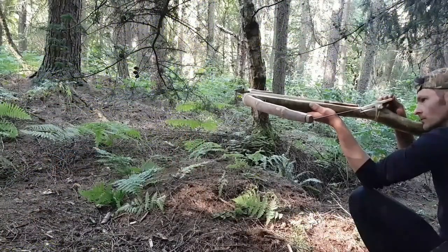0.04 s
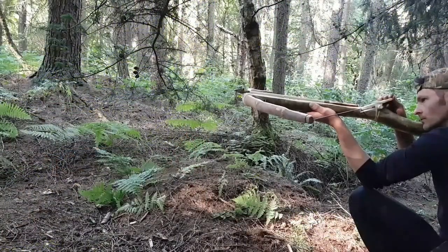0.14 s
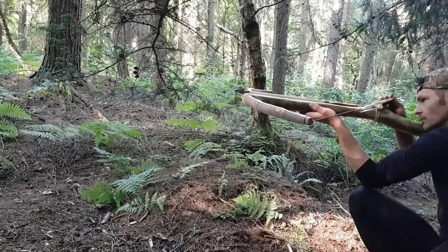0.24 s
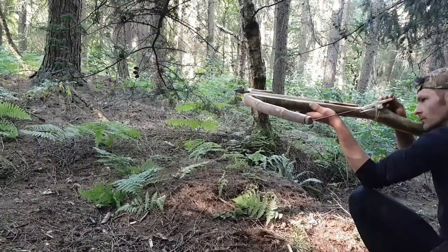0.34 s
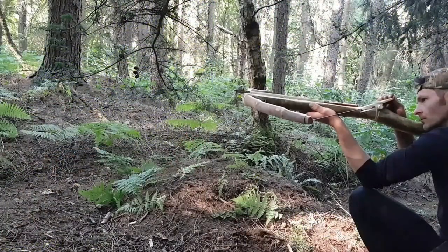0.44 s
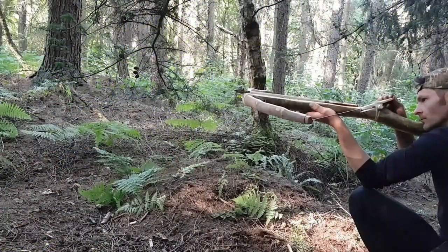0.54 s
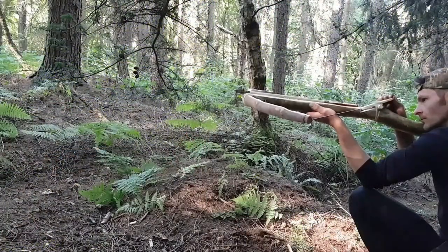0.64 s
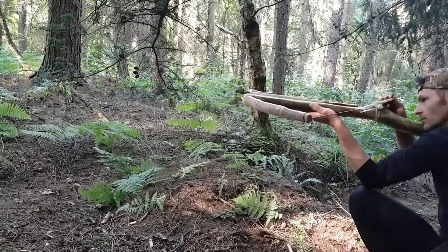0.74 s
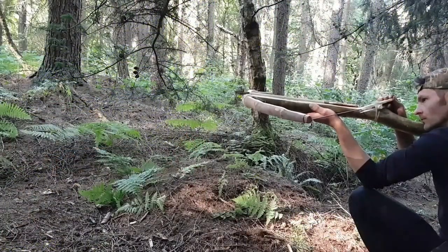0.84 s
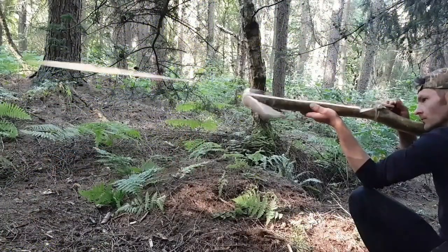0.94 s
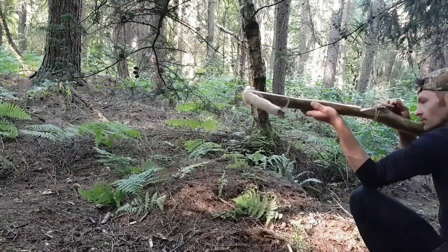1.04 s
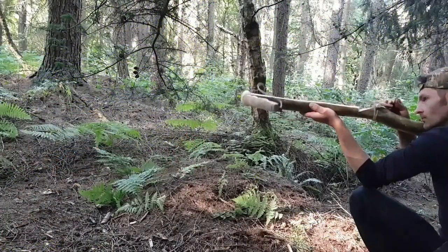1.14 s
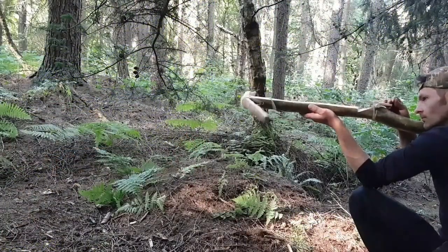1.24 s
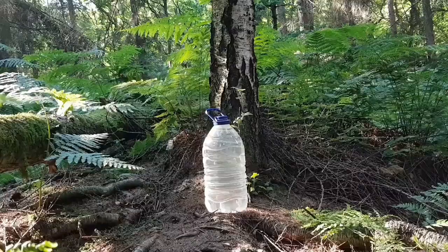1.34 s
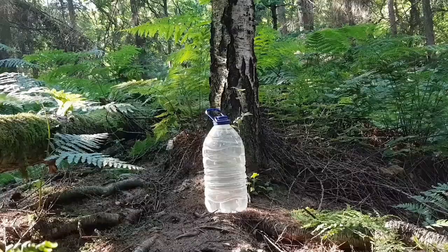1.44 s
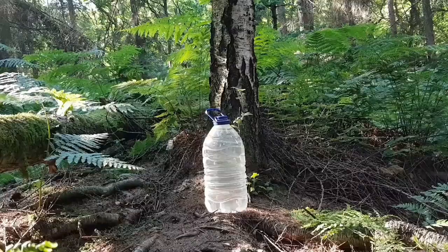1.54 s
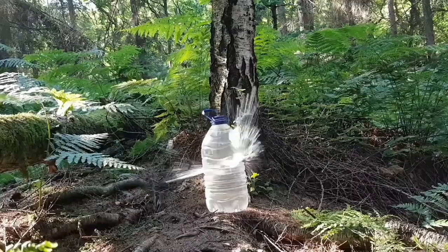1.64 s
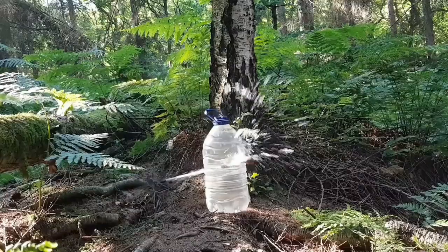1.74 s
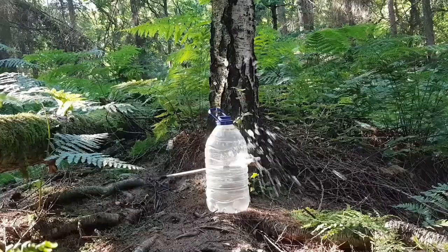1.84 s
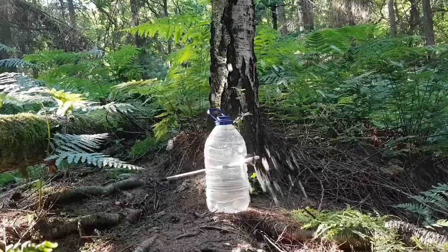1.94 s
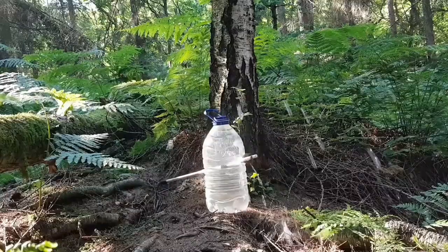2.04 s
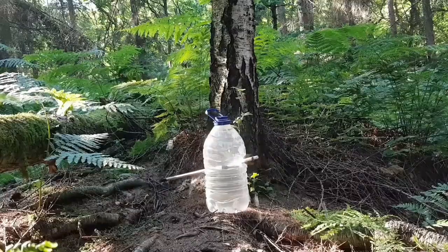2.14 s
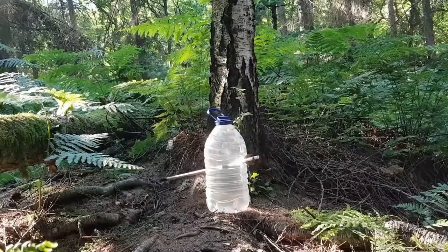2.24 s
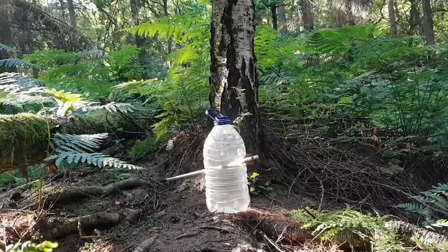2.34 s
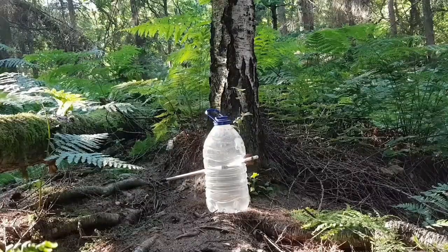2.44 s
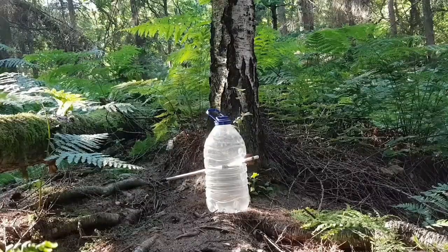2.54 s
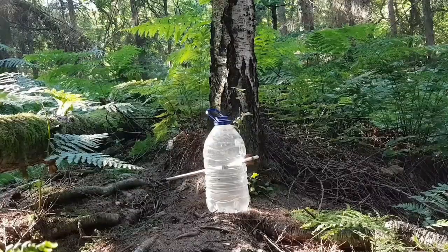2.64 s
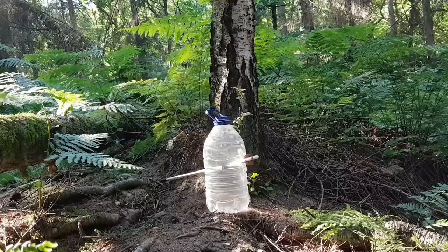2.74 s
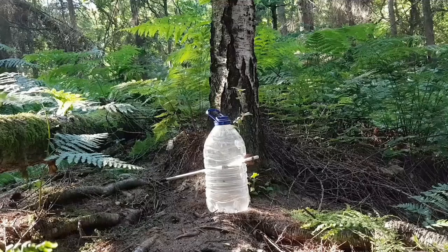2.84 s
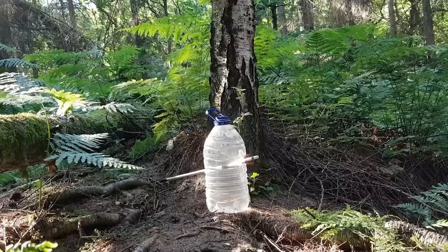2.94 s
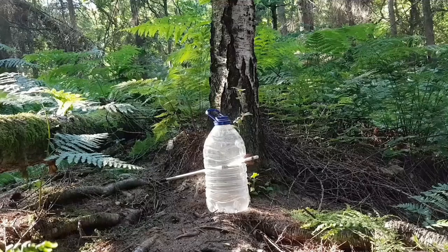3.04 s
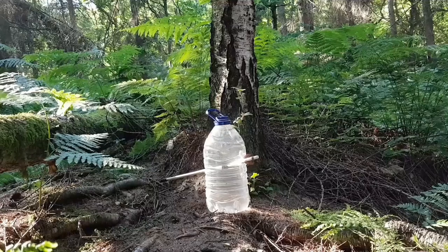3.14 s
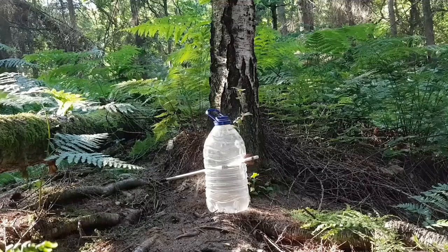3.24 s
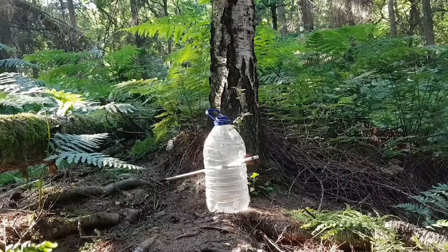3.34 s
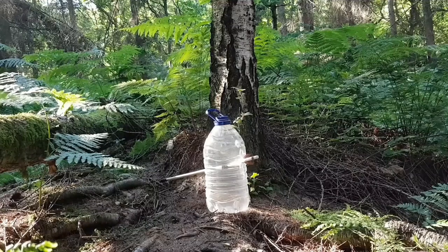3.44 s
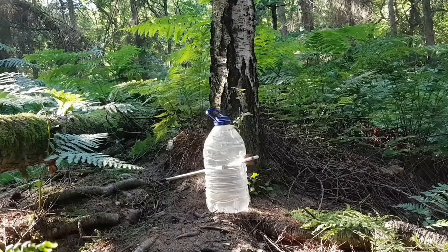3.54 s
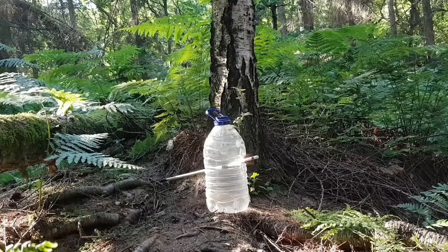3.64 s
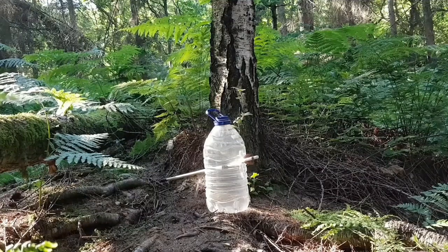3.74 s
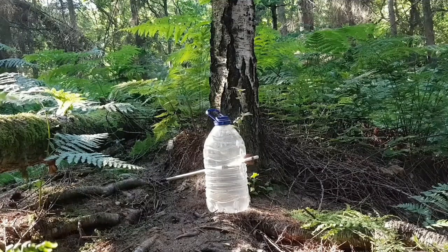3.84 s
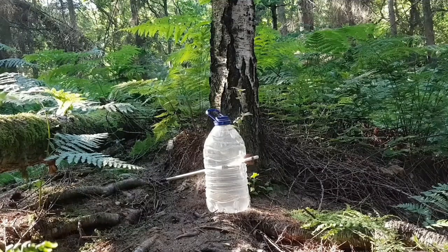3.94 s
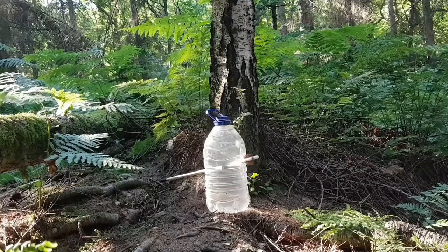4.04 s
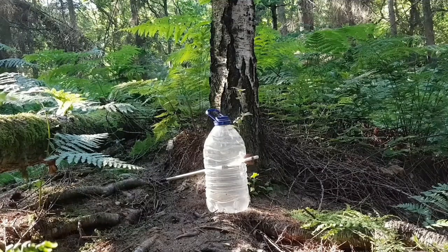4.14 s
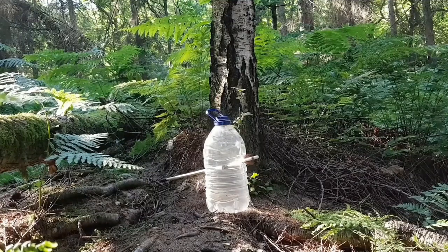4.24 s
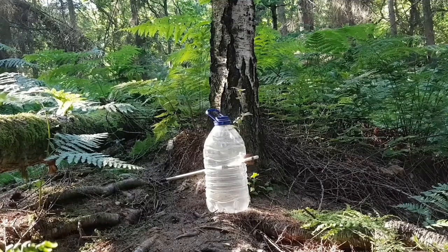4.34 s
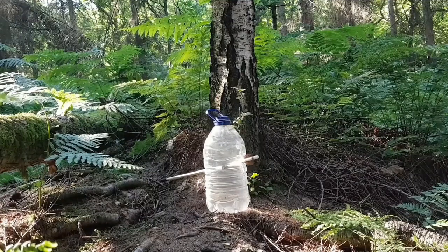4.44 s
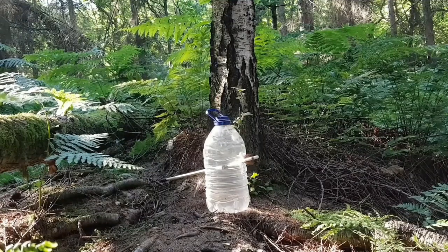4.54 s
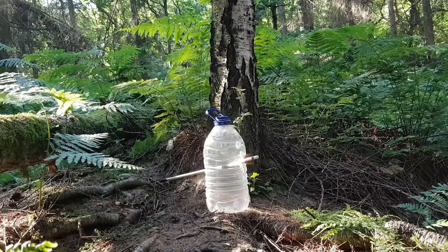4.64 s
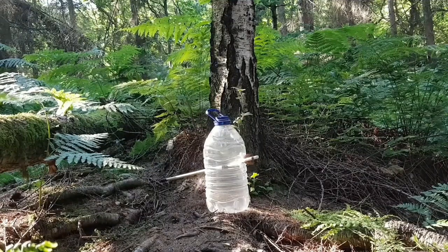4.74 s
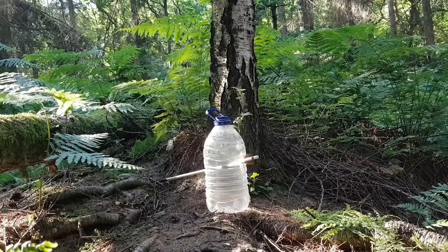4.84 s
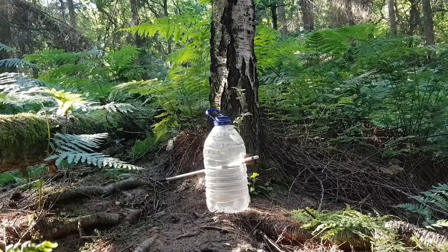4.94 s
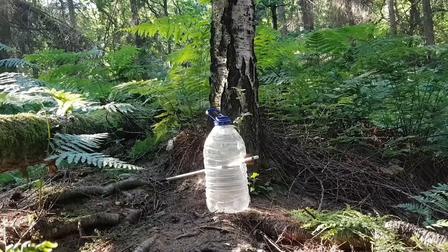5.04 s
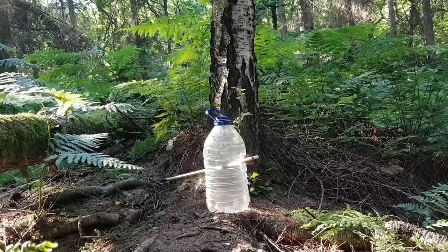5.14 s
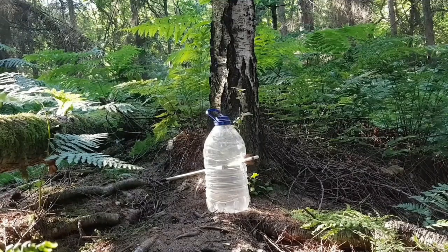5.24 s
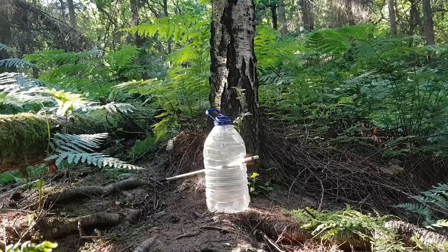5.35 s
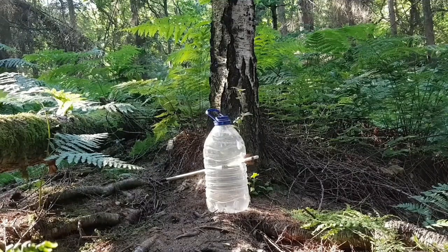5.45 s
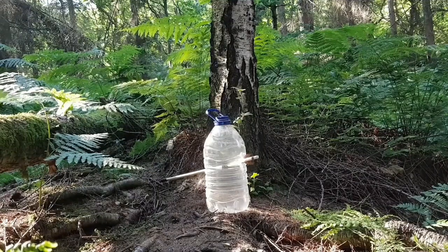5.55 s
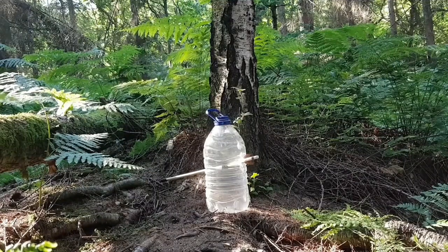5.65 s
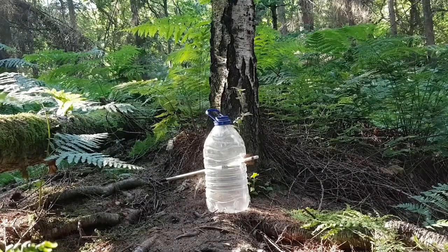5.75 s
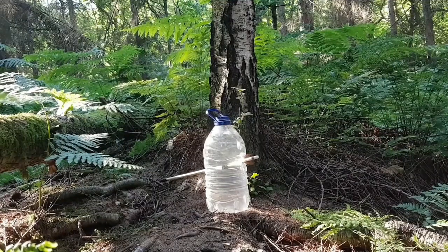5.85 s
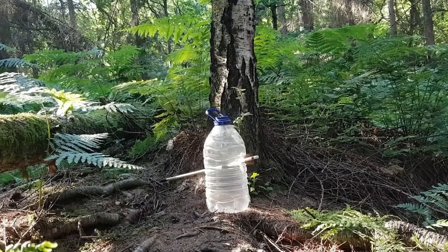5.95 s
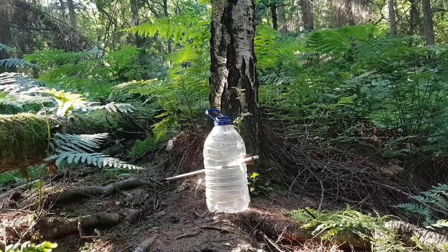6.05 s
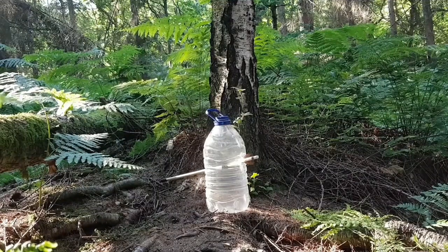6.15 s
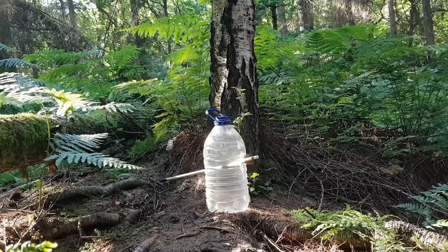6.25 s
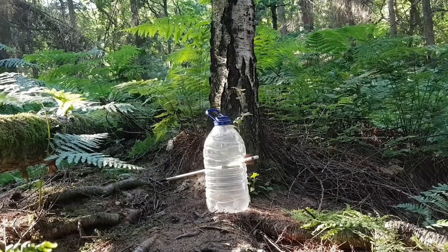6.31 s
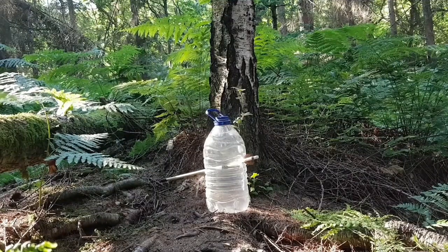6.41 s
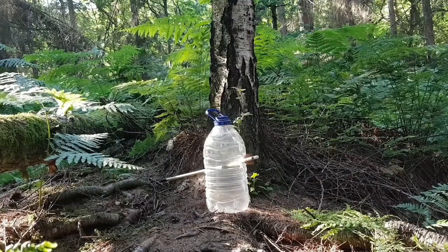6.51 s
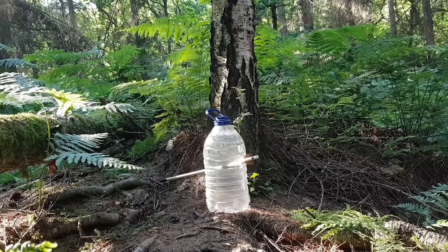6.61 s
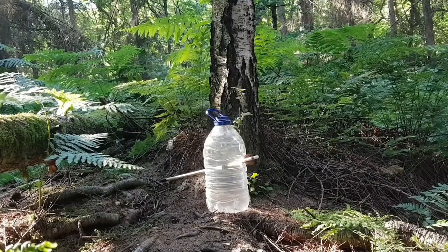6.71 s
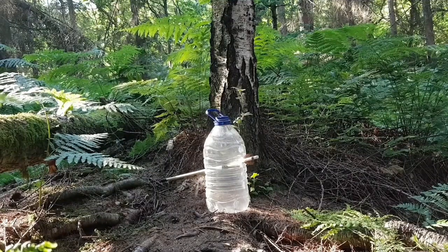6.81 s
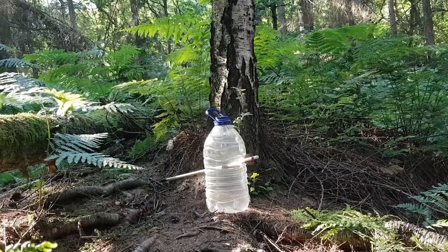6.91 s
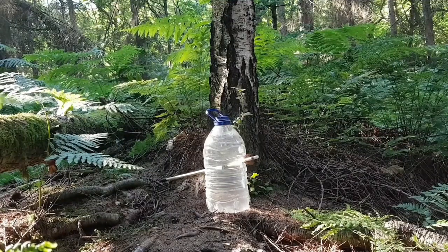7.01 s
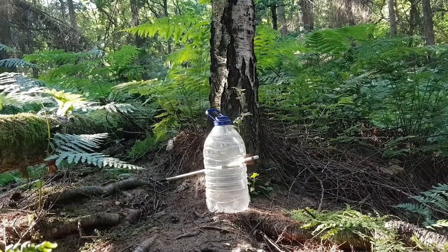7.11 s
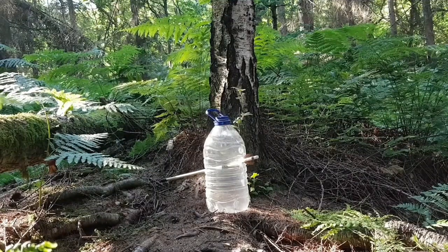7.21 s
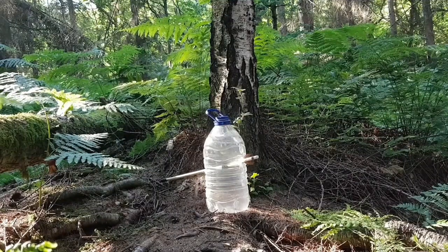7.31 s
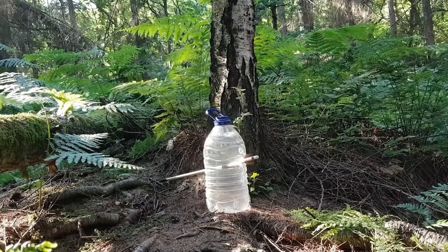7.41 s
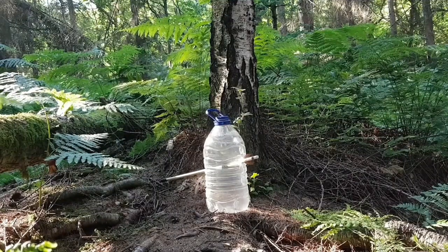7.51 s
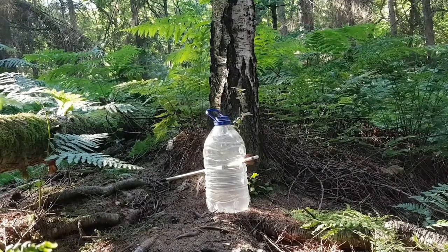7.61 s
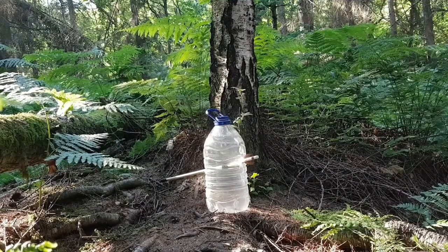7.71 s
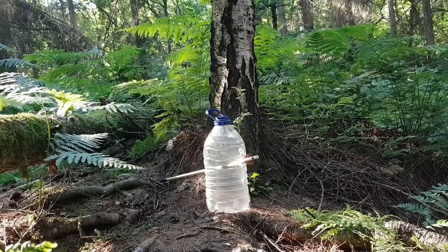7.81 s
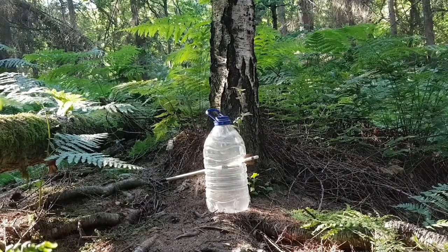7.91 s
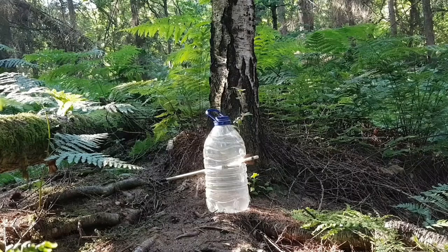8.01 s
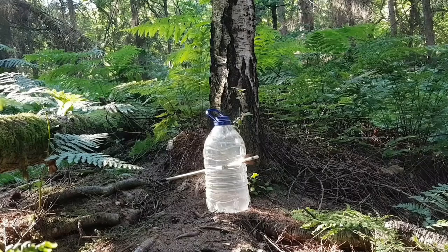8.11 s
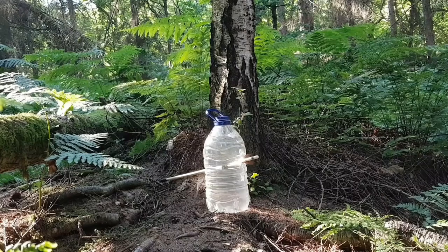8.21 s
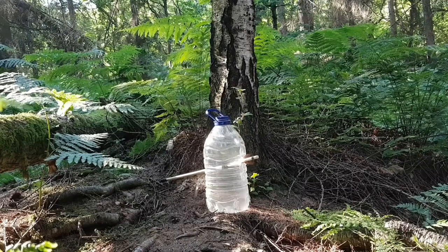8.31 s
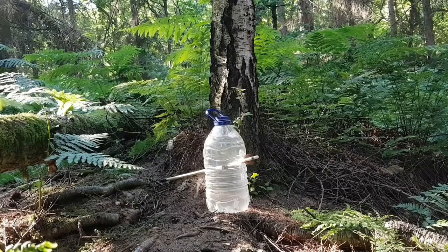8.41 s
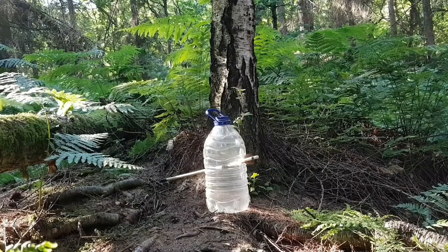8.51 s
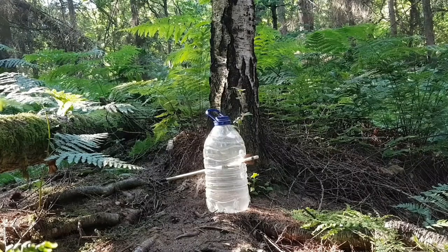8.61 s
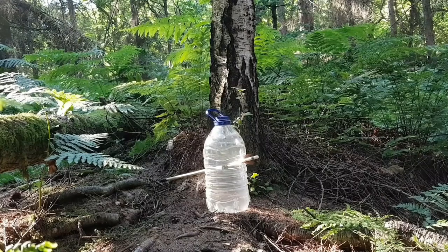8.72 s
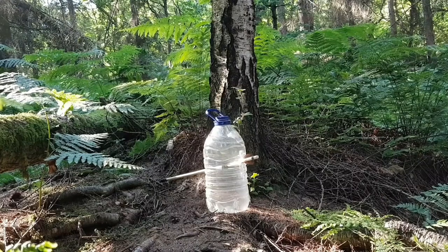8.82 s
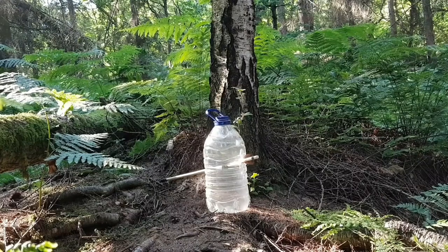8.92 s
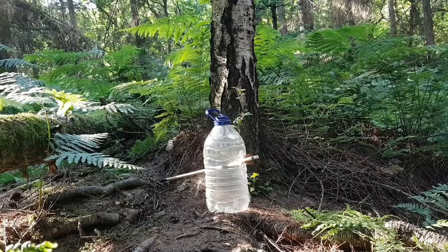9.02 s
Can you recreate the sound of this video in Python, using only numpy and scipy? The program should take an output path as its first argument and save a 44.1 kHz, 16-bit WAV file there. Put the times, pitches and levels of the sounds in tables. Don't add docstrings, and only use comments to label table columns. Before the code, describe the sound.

A quiet forest floor with a faint, low, slightly wavering distant road hum and soft leaf hiss throughout. The microphone is first close to a wooden crossbow. From about 0.75 to 0.94 s, five tiny dry latch creaks tick by, quickening. At 1.04 s the string slaps its stop with a very sharp, loud crack, followed by a short woody rattle of stock and limbs fading within about 0.2 s. Around 1.33 s there is a very brief silent cut, then the target's air starts abruptly. At 1.64 s the same shot arrives duller and from afar; at 1.74 s a bolt punches a full plastic bottle against a trunk: a hard crack, damped hollow boom, wet spray and short slosh. From 2.1 s spray falls back on ferns, then irregular plops, fine patter and crisp drips on dry leaves continue to 9 s, with brighter ticks near 4.3, 7.3, 7.75 and 8.15 s.

```python
import sys
import numpy as np
from scipy import signal
from scipy.fft import rfft, irfft
from scipy.io import wavfile

SR = 44100
rng = np.random.default_rng(int(sys.argv[2]) if len(sys.argv) > 2 else 0)


def waveform_to_disk(signal):
    frames = np.transpose(np.atleast_2d(signal))
    scaled = np.clip(frames, -1, 1) * 32767
    samples = np.round(scaled).astype(np.int16)
    wavfile.write(sys.argv[1], SR, samples)


def to_linear_factor(level_db):
    exponent = np.asarray(level_db, float) / 20
    return 10 ** exponent


N = 399987

# start_s, end_s
CUT_S = (1.329, 1.3735)

# time_s, tyre_roar_db
TRAFFIC = [(0, -58), (.8, -58.5), (1.3, -57), (1.38, -56), (2.0, -60.5), (2.8, -57.5), (3.7, -57),
           (4.7, -54.5), (5.2, -55), (5.8, -57), (6.3, -56.5), (6.7, -57), (7.8, -56), (8.4, -56.5),
           (9.07, -55.5)]
RUMBLE_DB, RUMBLE_AT_BOW_DB = -1, -3
LEAVES_DB, LEAVES_FOLLOW = -71, 0.22
# freq_hz, density_db
AIR_COLOUR = [(12, -30), (20, -15.5), (42, -5), (111, -2.5), (182, -6), (344, -12), (506, -9), (766, -6.5),
              (1450, -19.5), (3910, -33), (8010, -36), (9450, -38.5), (11200, -35), (13500, -33),
              (14700, -42)]
# freq_hz, share
ROAD_SHARE = [(60, 0.99), (300, 0.86), (700, 0.52), (1400, 0.42), (3000, 0.035), (7000, 0.054)]
# freq_hz, t60_s
TREES_T60 = [(150, 0.62), (1000, 0.26), (4000, 0.27), (12000, 0.18)]
EDGES_HZ = 20 * 2 ** np.arange(0, 9.7, .4)
PORT_DIP_HZ, PORT_DIP_Q = 9440, 7.0
DIP_SHARE, DIP_SWAY = .45, .25
# sound_s, hushed_above_hz
HUSHES = [
    (1.036, 2300),
    (1.635, 2600),
    (1.732, 8000),
    (4.299, 12000),
    (7.333, 5000),
    (7.944, 13500),
    (8.147, 10500),
]
HUSH_S = .012

# time_s, level_db
FLOW = [(1.75, -84), (2.05, -68.5), (2.3, -70.5), (3.0, -73), (3.6, -78), (4.2, -74), (4.9, -72),
        (6.3, -72.5), (9.07, -73)]
PATTER_FOLLOWS = .4
# start_s, peak_db, pitch_hz
PLOPS = [(2.1025, -52, 1590), (2.174, -56, 2420), (2.236, -46, 1610), (2.271, -56.5, 1910),
         (2.4019, -54, 2540), (2.8115, -57, 1990), (3.158, -53, 3380), (3.2041, -54, 2480),
         (3.698, -54, 2640), (4.1723, -48.5, 3840), (4.371, -45.5, 2700), (4.6074, -42, 2910),
         (5.065, -53, 4400), (5.0954, -53.5, 3500), (5.1831, -54.5, 1950), (5.7638, -51.5, 4180),
         (5.9591, -50, 2060), (6.258, -51.5, 2870), (6.4138, -54, 2090), (6.5, -51, 3670),
         (7.001, -53.5, 3470), (7.335, -47, 3760), (7.365, -50.5, 2450), (7.6797, -48, 4380),
         (7.7722, -52.5, 2580), (7.815, -53.5, 2580), (7.9745, -52.5, 2140), (8.1369, -52, 1750),
         (8.69, -54, 2400), (8.968, -46.5, 4170)]
# start_s, peak_db, pitch_hz
STRAYS = [(2.174, -52, 2440), (2.3624, -61, 6000), (2.4564, -62.5, 2260), (2.5155, -56, 4760),
          (2.5266, -55, 2860), (2.5837, -56, 4440), (2.6662, -66, 2480), (3.143, -49.5, 3200),
          (3.254, -55, 2950), (3.431, -59, 2200), (3.6506, -56, 2340), (3.754, -57, 5000),
          (3.774, -58, 2240), (3.79, -54, 6560), (4.1597, -59.5, 3600), (4.4514, -53, 4530),
          (4.5256, -57, 2300), (4.5665, -60, 2300), (4.7174, -56, 5980), (4.7336, -55, 4700),
          (4.76, -58, 2460), (5.341, -54, 2490), (5.3788, -58, 2920), (5.7836, -48.5, 6720),
          (6.0683, -52, 3730), (6.197, -57, 2560), (6.6715, -53, 2780), (6.775, -62, 2274),
          (6.866, -61, 2360), (7.3925, -57, 2510), (8.1738, -51.5, 2560), (8.2197, -52, 5850),
          (8.325, -52.5, 4580), (8.3818, -53, 2360), (8.586, -59, 2310), (8.748, -60, 6090),
          (8.996, -50.5, 2310), (9.0277, -56, 2250)]
# start_s, peak_db, pitch_hz
GRIT = [(2.405, -55, 7800), (2.9754, -63.5, 6280), (3.0774, -68, 8120), (3.2196, -60, 4850),
        (3.7164, -70.5, 5760), (3.8414, -65, 7480), (3.8791, -54, 6780), (3.9609, -58, 6590),
        (4.151, -56.5, 7660), (4.1849, -52.5, 6740), (4.2537, -58, 7550), (4.3944, -55, 7500),
        (4.506, -61, 6630), (4.8304, -62, 7000), (4.9013, -56.5, 6720), (4.9304, -59, 8420),
        (5.1068, -57, 4960), (5.4758, -52.5, 4900), (5.5288, -57.5, 5070), (5.5927, -63, 7960),
        (5.6464, -64, 6700), (5.6795, -57, 8940), (6.17, -59, 6060), (6.2412, -62, 4530),
        (6.328, -64, 8300), (6.328, -59, 5060), (6.4724, -65, 7600), (6.7246, -61, 6340),
        (6.977, -53, 6880), (7.1048, -54, 8140), (7.3014, -61, 6270), (7.4754, -55.5, 8100),
        (7.5794, -61, 6320), (7.6042, -58, 6090), (7.6445, -62, 5720), (7.9176, -63.5, 6850),
        (8.4662, -62, 6530), (8.517, -59, 7530), (9.0402, -53, 6010)]
# start_s, peak_db, pitch_hz, bright_re_peak_db
TICKS = [(2.1026, -45.5, 7840, -26.5), (3.1575, -51.5, 4760, -16), (3.1891, -46.5, 7700, -20),
         (3.8072, -44, 6820, -23), (3.907, -41.5, 4700, -35), (4.3017, -39.5, 5200, -22),
         (4.539, -48.5, 8200, -14), (4.6084, -40, 4670, -41), (4.7864, -50.5, 4700, -24),
         (5.28, -43.5, 6100, -28), (5.395, -43.5, 4430, -24), (5.462, -48, 4770, -19),
         (5.732, -43, 4620, -15), (5.8339, -47, 6800, -22), (5.8675, -45.5, 6700, -25),
         (5.9011, -49.5, 6700, -15), (6.358, -44.5, 4660, -18), (6.9297, -44, 4850, -12.5),
         (6.96, -48.5, 5430, -26), (7.3352, -38, 5080, -12.5), (7.5099, -45, 7320, -16),
         (7.681, -58, 4550, -20), (7.7456, -37.5, 8300, -14), (7.9466, -42, 5450, -16),
         (8.1504, -37.5, 7710, -23.5), (8.2845, -49, 5700, -19), (8.7618, -44.5, 6440, -17),
         (8.8206, -49, 5290, -20), (8.9677, -44.5, 4420, -17)]
# start_s, peak_db, pitch_hz, bright_re_peak_db
FALLBACK = [(2.1738, -49.5, 5600, -17.5), (2.2156, -46, 4790, -25), (2.2358, -47, 4830, -23),
            (2.2704, -52, 5020, -20), (2.311, -51, 5960, -12), (2.3221, -54, 8310, -13),
            (2.4008, -58, 7830, -15.5), (2.4161, -53, 4470, -17), (2.4356, -49.5, 4380, -21),
            (2.5125, -52.5, 6650, -31), (2.601, -51, 4370, -14), (2.6273, -48.5, 3940, -15),
            (2.7449, -68, 3580, -14), (2.9185, -48, 4160, -20.5), (2.9956, -58, 3620, -19.5),
            (3.1238, -63, 3540, -6.5)]
# start_s, peak_db
SPECKS = [(4.2168, -53), (4.3306, -54.5), (4.8589, -50), (4.9826, -51), (5.0629, -58), (5.0948, -51),
          (5.1831, -57), (5.3273, -52), (5.3844, -60), (5.7214, -58), (5.9334, -52.5), (5.984, -51),
          (6.069, -64), (6.1094, -63.5), (6.5301, -52.5), (6.5847, -53), (6.7325, -53), (6.8656, -50.5),
          (7.0004, -56), (7.188, -54.5), (7.235, -55), (7.443, -53), (7.4854, -49), (8.3244, -60),
          (8.834, -47.5)]
# start_s, peak_db
MIST = [(2.4224, -58), (3.2645, -62), (3.3952, -57.5), (3.5992, -60), (4.0314, -66.5), (4.5096, -62),
        (4.6887, -55), (4.7451, -56), (4.8963, -55), (5.3572, -59), (6.0315, -49), (6.1894, -63.5),
        (7.2065, -58), (7.5423, -59), (7.5737, -50.5), (7.881, -60), (8.3547, -61)]
CRISP = signal.butter(2, [4500, 8100], "band", fs=SR, output="sos")
BRIGHT = signal.butter(2, [8700, 15000], "band", fs=SR, output="sos")
CRISP_LOSS_DB = 13
LANDING_S = .0009
DROP_SIZE = 400

# start_s, string_edge_db, wood_db, blur_db
CREAKS = [
    (0.7478, -41.5, -42.5, -42),
    (0.8353, -44.5, -45, -41),
    (0.8855, -44.5, -40.5, -46),
    (0.917, -47.5, -44.5, -45.5),
    (0.935, -48, -44, -46),
]
# freq_hz, level_db, t60_s
LATCH_WOOD = [(850.6, -3.5, 0.014), (1370, -3, 0.024), (1890, -4, .018), (2550, 2, 0.0063),
              (3430, 3.5, 0.012)]
# freq_hz, level_db, t60_s
STRING_EDGE = [(4050, -3, 0.0051), (4900, -0.5, 0.0043), (6300, -1.5, .005), (7600, -8, 0.004),
               (9300, -11.5, .003), (11800, -4.5, .003), (13770, -9, .004)]
SETTLE_S, SETTLE_LOSS_DB = 0.0011, 3

# start_s, ring_db, hardness_db_per_octave, crack_db,
# rattle_db
SHOT_NEAR = [(1.0365, -58.5, 1.5, -43, -36), (1.0403, -29, 18, -37.5, -34), (1.0415, -14, 4, -11, -27),
             (1.0445, -31.5, 5.5, -23, -22), (1.049, -39, -1.5, -36, -21), (1.060, -33, 13.5, -38.5, -21),
             (1.066, -36, -9.5, -36, -29.5), (1.074, -40, -2, -38.5, -30), (1.082, -37, 1, -33.5, -33),
             (1.088, -36.5, -16, -47, -26), (1.107, -45, -16, -37, -33.5), (1.126, -56, -7, -37, -45)]
# start_s, ring_db, hardness_db_per_octave,
# crack_db, rattle_db
SHOT_FAR = [(1.6355, -48.5, -8.5, -47, -38), (1.6380, -36.5, 3.5, -33.5, -31.5),
            (1.6393, -13.5, 0.5, -7.5, -29), (1.642, -21.5, 2, -31, -35.5),
            (1.6455, -27.5, 2.5, -24.5, -24.5), (1.659, -29, -12.5, -39.5, -35.5),
            (1.665, -36, 1, -32.5, -28), (1.670, -40, 1, -32, -27.5), (1.6762, -28.5, -0.5, -19, -30.5),
            (1.684, -34.5, -2, -33.5, -36), (1.7045, -33.5, -13, -49.5, -42)]
# start_s, ring_db,
# hardness_db_per_octave, crack_db, spray_db
IMPACT = [(1.7315, -48, 5.5, -45, -37), (1.7350, -29.5, 15.5, -25, -29.5), (1.738, -28, 3.5, -9, -19),
          (1.7392, -25, 2.5, -17, -22), (1.7405, -19.5, 0.5, -18, -30), (1.7445, -24.5, 9, -31, -27.5),
          (1.7465, -26.5, 6.5, -23, -23.5), (1.748, -28, 4, -20.5, -27), (1.753, -28, 3, -38, -27),
          (1.759, -32.5, 4.5, -42.5, -29), (1.769, -37, 2.5, -37, -25), (1.7725, -34, -1, -29.5, -26.5),
          (1.784, -44.5, -7, -48, -34), (1.822, -63, 12, -43.5, -56)]
# freq_hz, level_db, t60_s
BOW_NEAR = [(70, -29.5, 0.11), (200, -24.5, 0.034), (418, -25, 0.048), (640, -14, 0.034), (880, -9.5, 0.04),
            (960, -12, 0.066), (1276, -3.5, 0.065), (1420, 1, 0.027), (1590, 5, .03), (1750, -3, 0.027),
            (1922, -2.5, 0.071), (2310, -19, 0.097), (2580, -13.5, 0.018), (3800, -14.5, 0.013)]
# freq_hz, level_db, t60_s
BOW_FAR = [(172, -23, 0.17), (452, -14, 0.059), (492, -18.5, 0.063), (820, -10.5, 0.022),
           (1070, -11, 0.024), (1299, 0.5, 0.02), (1630, 3.5, 0.014), (1750, 0.5, .015), (1930, 2.5, 0.019),
           (2170, -7, 0.03), (2411, -12.5, 0.02), (2900, -10.5, 0.01), (3460, -23, 0.016)]
# freq_hz, level_db, t60_s
BOTTLE = [(107.9, -17, 0.037), (165, -32.5, 0.04), (300, -23, 0.03), (420, -14.5, 0.039), (550, -10, 0.015),
          (700, -6, 0.027), (853, -8, 0.023), (1180, -15, 0.013), (1700, -10, .022), (2140, -8.5, 0.028),
          (2600, -12.5, .012), (3120, -8, 0.0079), (3800, -15, 0.0054)]
# freq_hz, density_db
RATTLE_NEAR = [(29, -46), (50, -29.5), (538, -11.5), (701, -13), (913, -17), (1110, -3.5), (1280, -17),
               (2000, -10.5), (4400, -18.5), (12500, -25.5), (14400, -26), (15500, -82)]
# freq_hz, density_db
RATTLE_FAR = [(59, -37.5), (100, -5.5), (362, -18.5), (457, -6.5), (1110, -20.5), (2000, -7), (4100, -12),
              (7250, -15), (13900, -21.5), (15500, -51.5)]
# freq_hz, density_db
SPRAY = [(59, -40), (100, -23.5), (177, -11), (843, -15), (936, -12.5), (1400, -13), (2130, -11),
         (4300, -16), (6500, -18.5), (13900, -26), (15500, -42.5)]
# start_s, freq_hz, level_db, t60_s
PINGS_NEAR = [(1.043, 607, -24, .03), (1.060, 1430, -26, 0.033), (1.087, 1610, -27, .04),
              (1.0495, 2240, -27, .025), (1.052, 1300, -29, .06), (1.0645, 893, -22, 0.056),
              (1.0845, 880, -33, .04), (1.088, 918, -22.5, 0.038), (1.1095, 920, -28, .035),
              (1.133, 930, -38, .04)]
# start_s, freq_hz, level_db, t60_s
PINGS_FAR = [(1.6393, 1647, -13, .03), (1.6388, 6900, -16.5, .005), (1.6445, 470, -25.5, .04),
             (1.6657, 2500, -25.5, .02), (1.6756, 1700, -30.5, .015), (1.7005, 2250, -35, .025)]
# start_s, freq_hz, level_db, t60_s
PINGS_BOTTLE = [(1.7345, 2600, -24.5, .012), (1.738, 3730, -20.5, 0.01), (1.7394, 704, -10.5, .02),
                (1.740, 1980, -19, 0.02), (1.745, 3060, -19, 0.012), (1.7485, 1620, -22, 0.029),
                (1.755, 2156, -27, .05), (1.7695, 2250, -30.5, 0.022), (1.771, 1600, -31, .025)]
PING_RISE_S = 0.0011
# freq_hz, density_db
CRACK = [(1500, -3.5), (3000, -4), (6500, 4.5), (9800, -12.5), (13500, 0), (15500, -7.5), (17000, -38.5)]
EDGE_DB, SPLINTER_DB, SPLINTER_T60_S = 7, -3.5, 0.0068
# first_t60_s, last_t60_s, loosening_s, settling_db,
# settling_t60_s
SHAKE_NEAR = (0.0275, 0.54, -8, -35.5, .5)
SHAKE_FAR = (0.07, 0.14, 2.2, -39.5, 0.42)
SLOSH = (0.0417, 0.06, -1.1, -44.5, 0.57)
THUMP_S = 1.7435
# freq_hz, level_db, t60_s
THUMP = [(177, -21.5, 0.078), (201, -25.5, 0.066)]


def at_hz(points, hz):
    table = np.array(points)
    return np.interp(np.log(hz), np.log(table[:, 0]), table[:, 1])


def in_time(rows):
    return np.interp(np.arange(N) / SR, *np.transpose(rows))


def band(x, low_hz, high_hz):
    return signal.sosfilt(signal.butter(2, [low_hz, high_hz], "band", fs=SR, output="sos"), x)


def rms_one(x):
    return x / np.sqrt(np.mean(x ** 2) + 1e-20)


def ring(clicks, hz, t60):
    r, w = to_linear_factor(-60 / (t60 * SR)), 2 * np.pi * hz / SR
    return signal.lfilter([0, np.sin(w)], [1, -2 * r * np.cos(w), r * r], clicks + 1e-18)


def drift(rate):
    r = np.exp(-80 * np.pi * rate / SR)
    slow = signal.lfilter([1], [1, -2 * r, r * r], rng.standard_normal(N // 40 + 2002))[2000:]
    return np.interp(np.arange(N) / 40, np.arange(len(slow)), rms_one(slow))


def coloured(white, spectrum):
    hz = np.maximum(np.fft.rfftfreq(white.shape[-1], 1 / SR), 10)
    return rms_one(irfft(rfft(white) * to_linear_factor(at_hz(spectrum, hz)), white.shape[-1]))


def to_ports(x, lag_ms, pan_db):
    left, right = x if x.ndim == 2 else (x, x)
    late = np.roll(left, round(lag_ms * SR / 1000))
    return np.array([late * to_linear_factor(pan_db / 2), right * to_linear_factor(-pan_db / 2)])


def trees(x, wet_db):
    t, white = np.arange(SR // 2) / SR, rng.standard_normal((2, SR // 2))
    tail = 0
    for low, high in zip(EDGES_HZ[4::2], EDGES_HZ[6::2]):
        t60 = at_hz(TREES_T60, np.sqrt(low * high))
        tail = tail + band(white, low, high) * to_linear_factor(-60 * t / t60)
    tail = tail * (1 - np.exp(-t / 0.0027)) / np.sqrt(np.sum(tail ** 2) / 2)
    return x + to_linear_factor(wet_db) * signal.fftconvolve(x, tail, axes=1)[:, :x.shape[1]]


def hush(hiss):
    size = round(HUSH_S * SR)
    window = np.pad(signal.windows.tukey(size, .3), size)
    for s, above_hz in HUSHES:
        near = slice(round(s * SR) - 2 * size, round(s * SR) + size)
        high_pass = signal.butter(4, above_hz, "high", fs=SR, output="sos")
        hiss[:, near] -= signal.sosfiltfilt(high_pass, hiss[:, near]) * window


def air():
    roar_db = in_time(TRAFFIC)
    leaves_db = LEAVES_DB + LEAVES_FOLLOW * (roar_db - roar_db.mean())
    rumble_db = roar_db + np.where(np.arange(N) / SR < CUT_S[1], RUMBLE_AT_BOW_DB, RUMBLE_DB)
    levels = to_linear_factor(rumble_db), to_linear_factor(roar_db), np.hypot(to_linear_factor(leaves_db), to_linear_factor(in_time(FLOW)))
    groups = np.zeros((3, 2, N))
    white, together = rng.standard_normal((2, 3, N)), drift(2.1)
    road = [to_ports(w[0], lag_ms=0.33, pan_db=0) for w in white]
    ahead = [to_ports(w[0], lag_ms=0.09, pan_db=0) for w in white]
    for k, (low, high) in enumerate(zip(EDGES_HZ, EDGES_HZ[1:])):
        hz = np.sqrt(low * high)
        share = np.clip(at_hz(ROAD_SHARE, hz), 0, 1)
        from_road = (road if hz > 300 else ahead)[k % 2]
        mixed = np.sqrt(share) * from_road + np.sqrt(1 - share) * white[k % 2, 1:]
        sway_db = (0.38 * together + 0.73 * drift(9.9)) * (2.0 - 0.54 * (hz > 2500))
        flutter_db = .8 * (hz > 7000) * drift(30)
        gain = to_linear_factor(at_hz(AIR_COLOUR, hz) + sway_db + flutter_db)
        groups[int(hz > 300) + int(hz > 1500)] += gain * band(mixed, low, high)
    hiss = signal.sosfilt(signal.ellip(6, .5, 30, 14550, fs=SR, output="sos"), groups[2])
    dip = signal.lfilter(*signal.iirpeak(PORT_DIP_HZ, PORT_DIP_Q, fs=SR), hiss)
    hiss -= np.clip(DIP_SHARE + DIP_SWAY * drift(5.7), 0, 1) * dip
    hush(hiss)
    groups[2] = hiss
    return sum(rms_one(g) * level for g, level in zip(groups, levels))


def drop(hz, crisp_db, bright_db, cycles):
    t = np.arange(DROP_SIZE) / SR - LANDING_S
    splat = rng.standard_normal((2, DROP_SIZE)) * to_linear_factor(-60 * t / .0035) * (t > 0)
    around = signal.iirpeak(hz * 1.18, 1.1, fs=SR)
    push = signal.lfilter(*around, signal.lfilter(*around, splat[0]))
    note = ring(push, hz, cycles / hz) + 0.37 * ring(push, hz * 1.567, cycles / hz / 2)
    parts = note, signal.sosfilt(CRISP, splat[1]), signal.sosfilt(BRIGHT, splat[1])
    return sum(to_linear_factor(db) * p / np.abs(p).max() for db, p in zip((0, crisp_db, bright_db), parts))


def drips():
    out, flow_db = np.zeros((2, N + DROP_SIZE)), in_time(FLOW) + 70
    # start_s, peak_db, pitch_hz, crisp_db, bright_db
    rows = [(s, db + 0.98, hz, -15, -19) for s, db, hz in PLOPS]
    rows += [(s, db - 1.0, hz, -8, -14) for s, db, hz in STRAYS]
    for s, db, hz, bright_db in TICKS + FALLBACK:
        crisp_db = -2.5 - CRISP_LOSS_DB * np.log2(hz / 5000)
        rows.append((s, db - 4.0, hz, crisp_db, min(bright_db + 18.5, 2.5)))
    rows += [(s, db - 5.5, 6500.0, -1.5, 6.0) for s, db in SPECKS]
    rows += [(s, db + 0.5, hz, -14, -16) for s, db, hz in GRIT]
    rows += [(s, db - 11, 9500.0, -14, 12) for s, db in MIST]
    for s, peak_db, hz, crisp_db, bright_db in rows:
        i, side_db = round(s * SR), rng.normal(0.2, 1.8)
        one = drop(hz, crisp_db, bright_db, cycles=10.6)
        out[:, i:i + DROP_SIZE] += to_linear_factor(peak_db) * one * to_linear_factor([[side_db], [-side_db]])
    for when, pitch, size, side, bright in rng.random((300, 5)):
        i = round((2.05 + when * (N / SR - 2.05)) * SR)
        small = drop(1600 * 5 ** pitch ** 1.5, -9 + 12 * (bright - .5), -6.5 + 18 * (bright - .5), cycles=11.0)
        level_db = -68.5 + 10.2 * size + PATTER_FOLLOWS * flow_db[min(i, N - 1)]
        side_db = 6 * side - 3
        out[:, i:i + DROP_SIZE] += to_linear_factor(level_db) * small * to_linear_factor([[side_db], [-side_db]])
    return out[:, :N]


def latch():
    wood, edge, t = np.zeros(2 * SR), np.zeros(2 * SR), np.arange(950) / SR
    echo = np.zeros(2 * SR)
    for s, edge_db, wood_db, blur_db in CREAKS:
        edge[round(s * SR)] = to_linear_factor(edge_db)
        edge[round((s + SETTLE_S * rng.uniform(.8, 1.2)) * SR)] = -to_linear_factor(edge_db - SETTLE_LOSS_DB)
        wood[round((s + SETTLE_S / 2) * SR)] = to_linear_factor(wood_db)
        blur = rng.standard_normal(950) * t / t[-1]
        echo[round(s * SR):round(s * SR) + 950] += to_linear_factor(blur_db) * blur
    ticks = np.zeros(2 * SR)
    for clicks, modes in ((wood, LATCH_WOOD), (-edge, STRING_EDGE)):
        for k, (hz, mode_db, t60) in enumerate(modes):
            ticks += (-1) ** k * to_linear_factor(mode_db - 0.5) * ring(clicks, hz, t60)
    echo = band(band(echo, 2300, 4310), 2300, 4310)
    heard = trees(to_ports(ticks + echo, lag_ms=.14, pan_db=3.5), wet_db=-18)
    return np.pad(heard, ((0, 0), (0, N - 2 * SR)))


def thump():
    click = np.zeros(2 * SR + SR // 2)
    click[round(THUMP_S * SR)] = 1
    boom = sum(to_linear_factor(db) * ring(click, hz, t60) for hz, db, t60 in THUMP)
    return np.pad(boom, (0, N - len(boom)))


def blows(table, pings, shake, modes, spectrum, alike, grain_db, lag_ms, pan_db, wet_db, bright_db):
    start, size = round(table[0][0] * SR) - 200, SR // 2
    t, body, rush, out = np.arange(size) / SR, np.zeros(size), np.zeros(size), np.zeros((2, N))
    chance_db = rng.normal(0, 2, (len(table), len(modes)))
    at, rows = [round(row[0] * SR) - start for row in table], np.array(table)
    for k, (hz, mode_db, t60) in enumerate(modes):
        hard_db = rows[:, 2] * np.log2(max(hz, 500) / 1500)
        clicks = np.zeros(size)
        clicks[at] = to_linear_factor(rows[:, 1] + hard_db + mode_db + chance_db[:, k])
        body += (-1) ** k * ring(clicks, hz, t60)
    for s, hz, db, t60 in pings:
        i = round(s * SR) - start
        swing = to_linear_factor(db - 60 * t / t60) * (1 - np.exp(-t / PING_RISE_S))
        body[i:] += (swing * np.sin(2 * np.pi * hz * t))[:size - i]
    crack = [(hz, db + bright_db * np.log2(hz / 6000)) for hz, db in CRACK]
    snap = coloured(rng.standard_normal(size), crack)
    edge = np.roll(irfft(to_linear_factor(at_hz(crack, np.fft.rfftfreq(128, 1 / SR) + 1))), 16)
    first_s, last_s, loosen_s, settle_db, settle_s = shake
    rush[200:] = to_linear_factor(settle_db - 60 * t[:-200] / settle_s) ** 2 * (1 - np.exp(-t[:-200] / 0.0083))
    for i, (crack_db, rush_db) in zip(at, rows[:, 3:]):
        after = t[:size - i]
        t60 = last_s + (first_s - last_s) * np.exp(-(i - at[0]) / SR / loosen_s)
        body[i:] += to_linear_factor(crack_db + SPLINTER_DB - 60 * after / SPLINTER_T60_S) * snap[i:]
        body[i - 16:i + 112] += to_linear_factor(crack_db + EDGE_DB) * edge / edge.max()
        rush[i:] += to_linear_factor(rush_db - 60 * after / t60) ** 2 * (1 - np.exp(-after / .0007))
    graininess = to_linear_factor(grain_db * rms_one(band(rng.standard_normal(size), 100, 900)))
    white = rng.standard_normal((3, size)) * graininess
    share = np.clip(alike, 0, 1)
    grains = coloured(np.sqrt(share) * white[0] + np.sqrt(1 - share) * white[1:], spectrum)
    direct = to_ports(band(body, 55, 19000) + grains * np.sqrt(rush), lag_ms, pan_db)
    out[:, start:start + size] = trees(direct, wet_db)
    return out


def near_shot():
    return blows(SHOT_NEAR, PINGS_NEAR, SHAKE_NEAR, BOW_NEAR, RATTLE_NEAR, alike=0.29, grain_db=1.5,
                 lag_ms=0.11, pan_db=1.0, wet_db=-12.0, bright_db=0.0)


def far_shot():
    return blows(SHOT_FAR, PINGS_FAR, SHAKE_FAR, BOW_FAR, RATTLE_FAR, alike=0.57, grain_db=-4.0,
                 lag_ms=.39, pan_db=-1.4, wet_db=-13, bright_db=-2.0)


def bottle_hit():
    return blows(IMPACT, PINGS_BOTTLE, SLOSH, BOTTLE, SPRAY, alike=0.63, grain_db=-2.5,
                 lag_ms=0, pan_db=0.5, wet_db=-18.5, bright_db=1.0)


def scene():
    return air() + drips() + latch() + thump() + near_shot() + far_shot() + bottle_hit()


def band_limit(x):
    return signal.sosfilt(signal.butter(12, 15990, fs=SR, output="sos"), x)


def record(dry):
    t = np.arange(N) / SR
    gate = np.where(t > CUT_S[1], 1, np.clip((CUT_S[0] - t) / .007, .02, 1))
    rounded = .6 * np.tanh(dry / .6)
    low = signal.sosfilt(signal.ellip(8, .5, 45, 14600, fs=SR, output="sos"), rounded)
    top = signal.sosfilt(signal.butter(6, 14700, "high", fs=SR, output="sos"), rounded)
    mix = (low + to_linear_factor(-21.5) * top - .0005) * gate
    return band_limit(mix)


dry = scene()
out = record(dry)
waveform_to_disk(out)
```